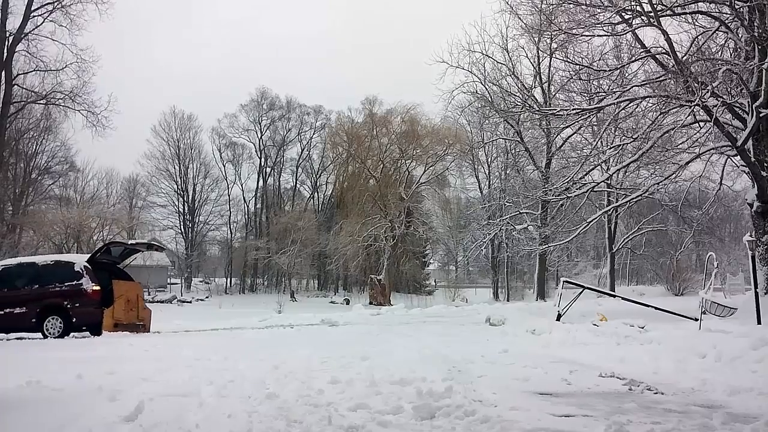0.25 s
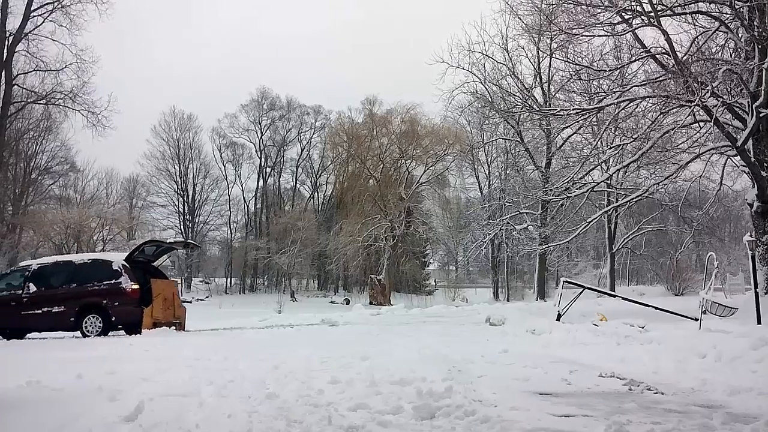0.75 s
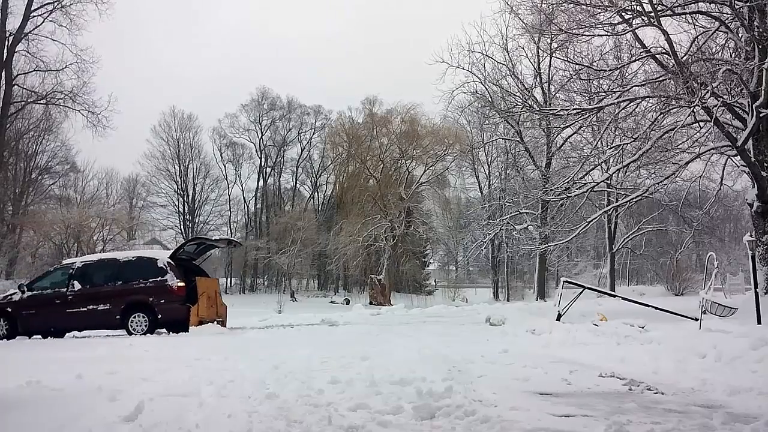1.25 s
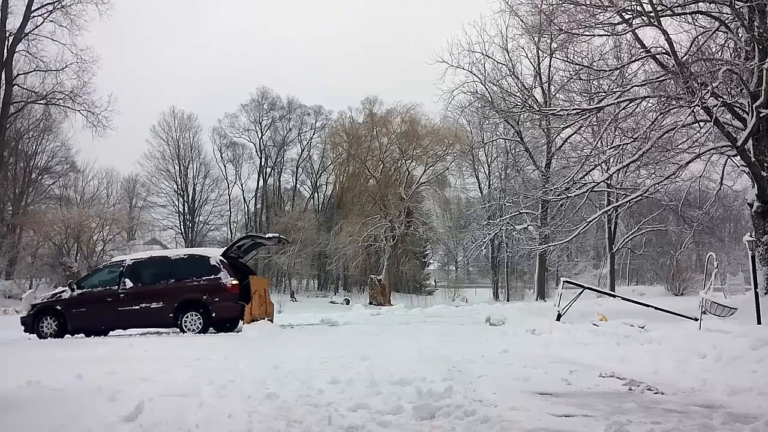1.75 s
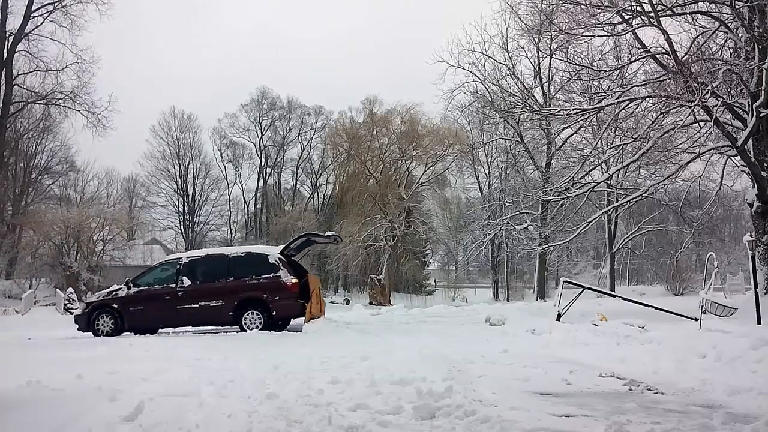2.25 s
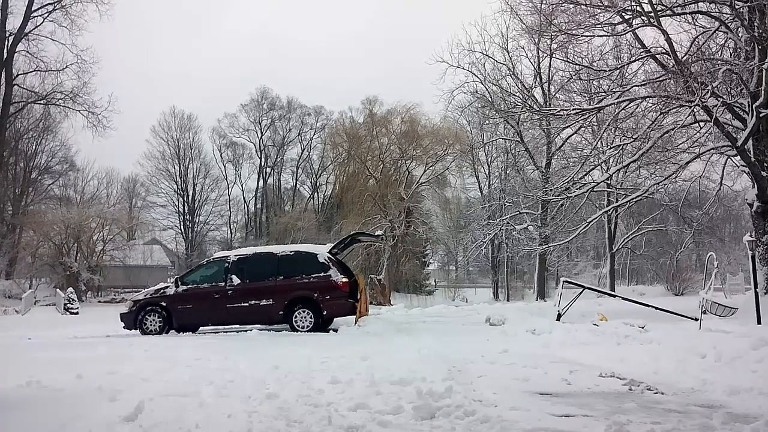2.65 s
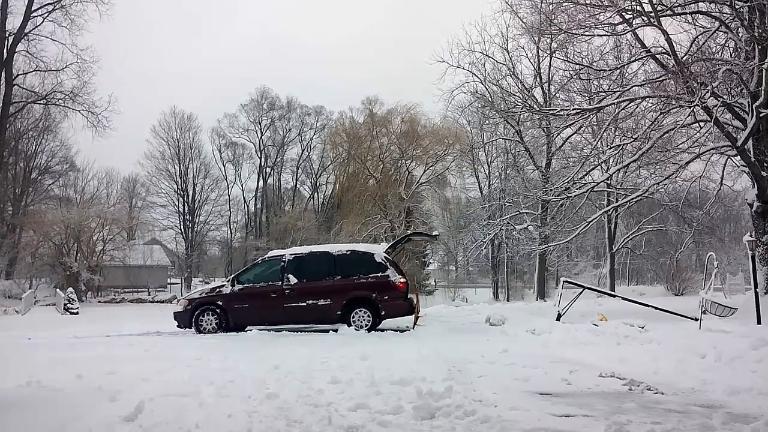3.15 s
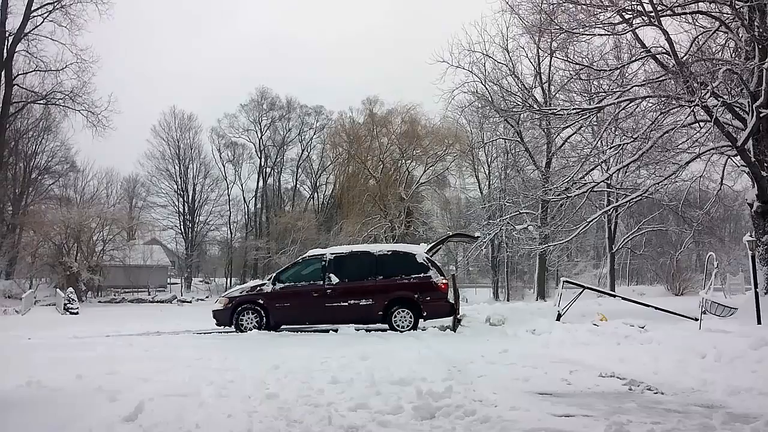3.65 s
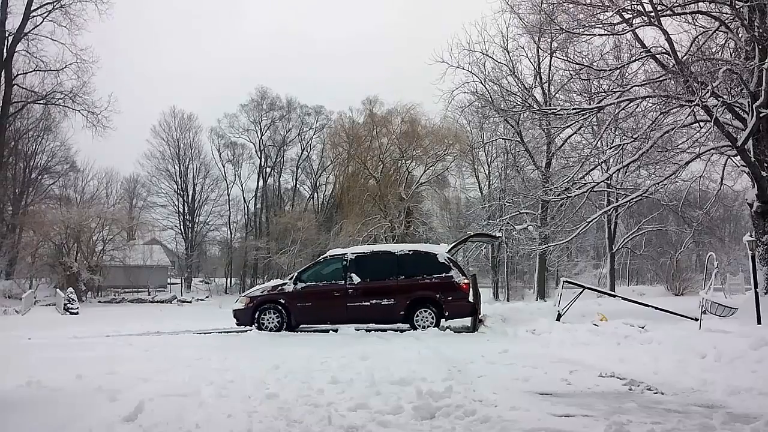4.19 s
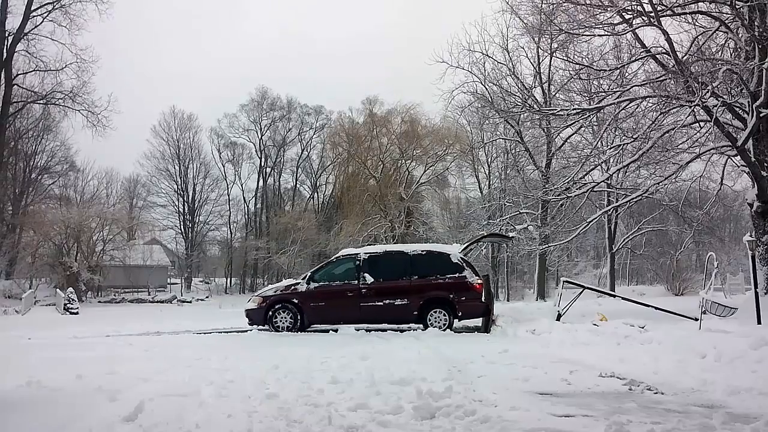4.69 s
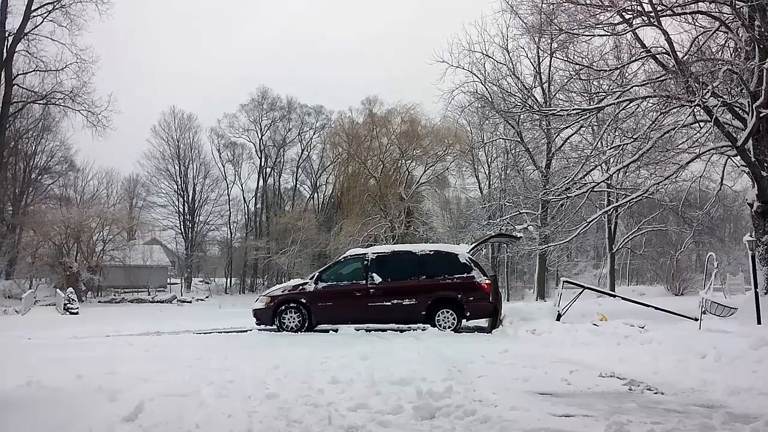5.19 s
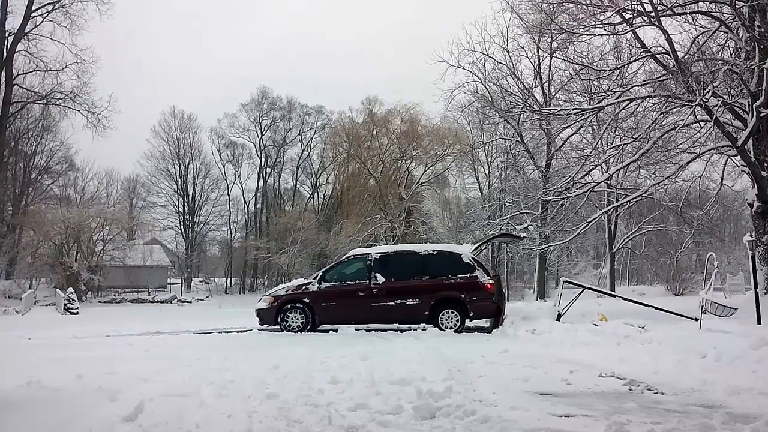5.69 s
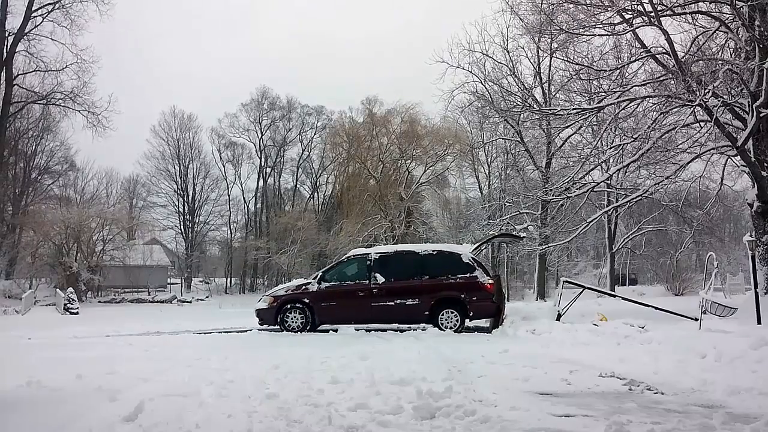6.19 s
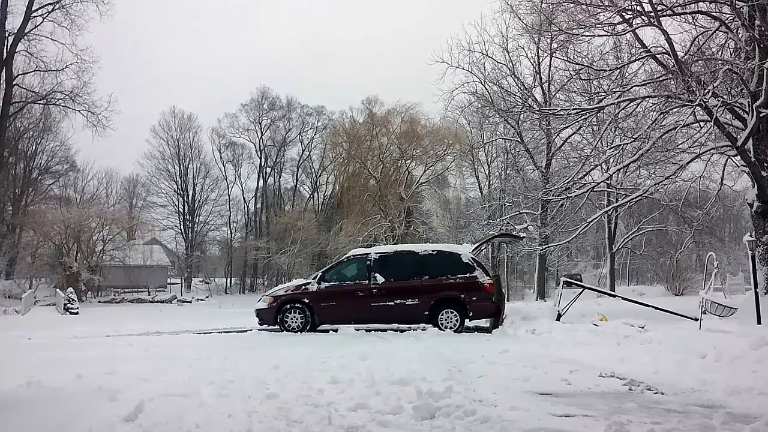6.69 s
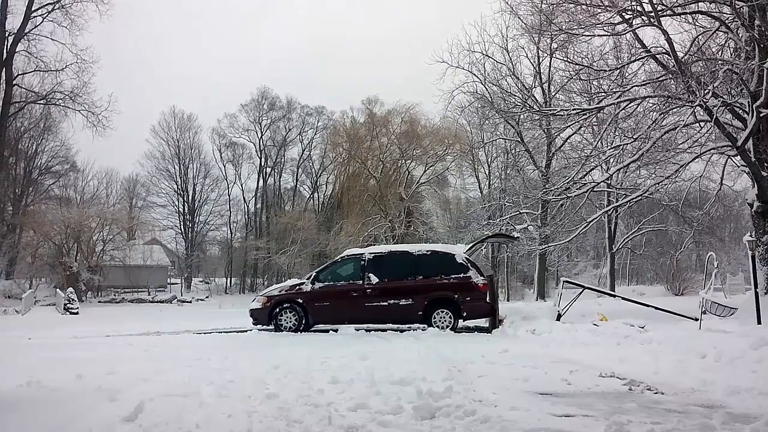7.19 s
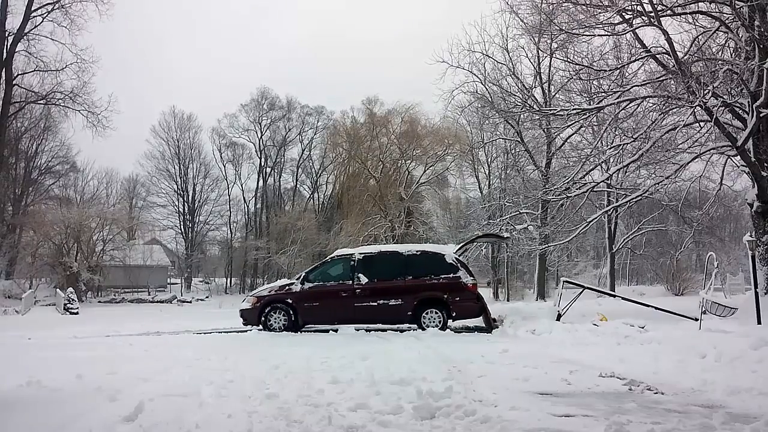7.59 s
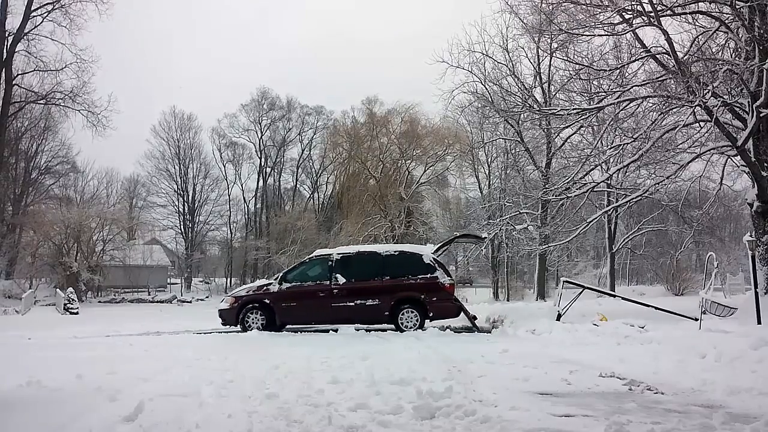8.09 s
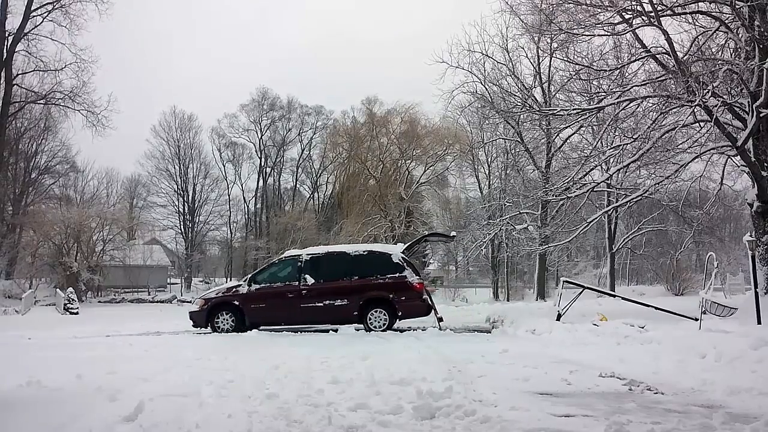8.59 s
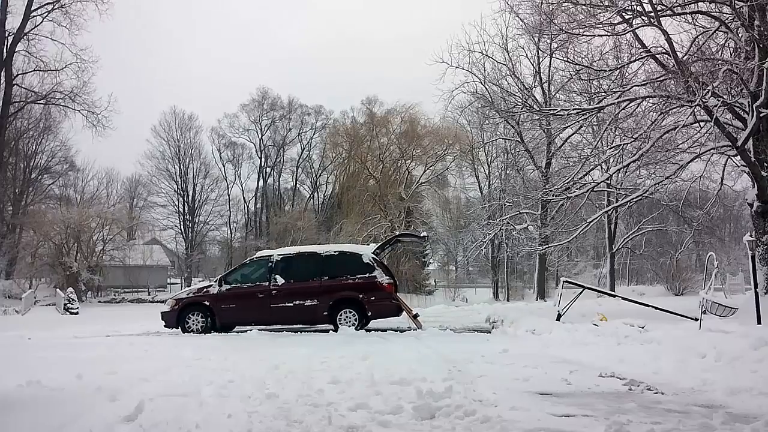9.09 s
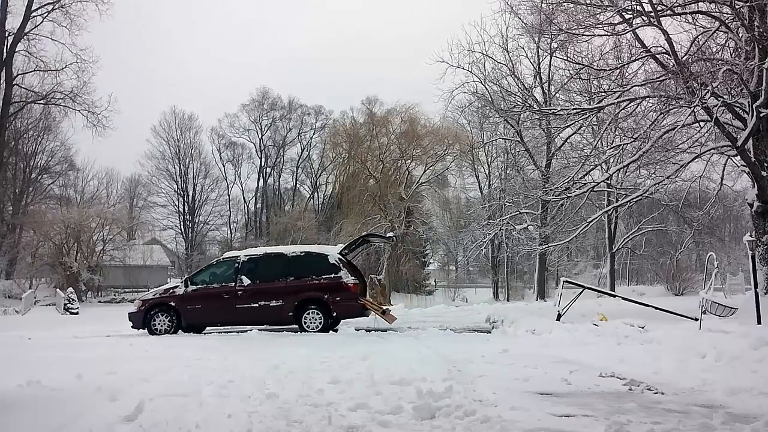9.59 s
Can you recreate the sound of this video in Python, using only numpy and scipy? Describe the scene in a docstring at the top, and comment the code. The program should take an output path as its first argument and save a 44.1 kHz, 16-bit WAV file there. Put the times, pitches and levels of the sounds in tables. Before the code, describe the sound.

In a snowy yard, a minivan backs up pushing snow with a plywood plow: low engine drone, gritty scraping, juddering board, a sharp early clack, squeaks and icy knocks. The scraping ends and the engine drops to a throbbing idle. A car passes on a wet road behind, then the van revs briefly and moves off with small metallic clicks. Distant stereo pickup outdoors.

```python
"""Minivan with a snow plow

A minivan backs through snow with a wooden plow: crushed grains judder and ring the board, then the van idles.
Its engine is a sum of multiples of a firing rate; two of them beat into a throb.
Behind it a car passes on a wet road: bands of noise that grow with nearness, swell and fade.
The van revs and pulls forward, and the plow's hinge clicks: short decaying tones as the board tips.
Heard from the yard, through two microphone ports."""
import sys
import numpy as np
from scipy import signal
from scipy.fft import rfft, irfft, next_fast_len
from scipy.io import wavfile
from scipy.ndimage import uniform_filter1d, map_coordinates

SR = 44100
rng = np.random.default_rng(int(sys.argv[2]) if len(sys.argv) > 2 else 0)


def generate_wav(signal):
    """Clip the signal to [-1, 1] and save it as 16-bit WAV at the path in sys.argv[1]."""
    frames = np.transpose(np.atleast_2d(signal))
    scaled = np.clip(frames, -1, 1) * 32767
    pcm = np.round(scaled).astype(np.int16)
    wavfile.write(sys.argv[1], SR, pcm)


N = 434385


def amp(db):
    """Decibels to gain."""
    return np.exp(np.asarray(db) * (np.log(10) / 20))


def unit(x):
    """x at rms 1."""
    return x / np.sqrt(np.mean(x ** 2) + 1e-20)


def along(points, hz):
    """(Hz, value) points interpolated on a log frequency axis."""
    point_hz, values = np.transpose(points)
    return np.interp(np.log(hz + 1), np.log(point_hz + 1), values)


def curves(rows):
    """One value per sample for each column after the time."""
    s, *columns = np.transpose(rows)
    return [np.interp(np.arange(N) / SR, s, column) for column in columns]


def during(rows):
    """1 up to the end of a table, then a 0.1 s fade."""
    end_s = rows[-1][0]
    return curves([(end_s, 1), (end_s + .1, 0)])[0]


def wobble(rate_hz, count=N):
    """Smooth random curve with rate_hz knots a second."""
    coarse = np.arange(0, count + 32, 32)
    knots = rng.standard_normal(int(N * rate_hz / SR) + 4)
    return np.interp(np.arange(count), coarse, map_coordinates(knots, [coarse * rate_hz / SR]))


def swells(times_s, lengths_s, levels_db, rise):
    """Gain of smooth swells peaking at the given times; rise is the share of each length before its peak."""
    t, power = np.arange(N) / SR, np.zeros(N)
    for s, length, db, share in np.broadcast(times_s, lengths_s, levels_db, np.clip(rise, .05, .95)):
        near = slice(*np.searchsorted(t, [s - length, s + length]))
        ramp = np.interp(t[near], [s - share * length, s, s + (1 - share) * length], [0, 1, 0])
        power[near] += (amp(db) * ramp) ** 2
    return np.sqrt(power)


def add(track, s, sound):
    """Mix a sound into a track at time s."""
    part = track[round(s * SR):][:len(sound)]
    part += sound[:len(part)]


def filtered(x, response):
    """x times a complex response of frequency."""
    size = next_fast_len(N + SR // 2)
    spectrum = rfft(x.astype(np.float32), size) * response(np.fft.rfftfreq(size, 1 / SR))
    return irfft(spectrum.astype(np.complex64), size)[..., :N]


def coloured(x, spectrum):
    """x through a (Hz, dB) spectrum, at rms 1."""
    return unit(filtered(x, lambda hz: amp(along(spectrum, hz))))


def grains(rate_hz, spread_db, channels=3):
    """Tiny fractures at random moments, of random sign and size; one row for each path to the ports."""
    count = int(rate_hz * N / SR)
    scale, kick = rng.standard_normal((2, channels, count))
    size = amp(spread_db * np.clip(scale, -2, 2)) * kick
    moments = rng.integers(N, size=(channels, count))
    return unit(np.array([np.bincount(m, g, N) for m, g in zip(moments, size)]))


def patches(shape):
    """Smooth random field over frequency and time, at rms 1."""
    over_hz = uniform_filter1d(rng.standard_normal(shape), size=3, axis=0)
    return unit(uniform_filter1d(over_hz, size=12, axis=1))


def gliding(gain, centre_hz, patchy_db, channels=3):
    """Patchy noise on each path, whose gain(frequency / centre) follows a moving centre."""
    noise = rng.standard_normal((channels, N), dtype=np.float32)
    hz, t, z = signal.stft(noise, SR, nperseg=1024)
    ratio = (hz[:, None] + 1) / np.interp(t, np.arange(N) / SR, centre_hz)
    shaped = z * (gain(ratio) * amp(patchy_db * patches(z.shape[1:])))
    return unit(signal.istft(shaped, SR, nperseg=1024)[1][:, :N])


PORT_S = 0.00048  # sound's travel time between the ports


def diffuse(pair):
    """Two unrelated signals as sound from all sides: alike at both ports mostly in the bass."""
    alike = lambda hz: 0.65 * np.sinc(2 * hz * PORT_S)
    mid, side = filtered(pair, lambda hz: np.sqrt(np.abs([1 + alike(hz), 1 - alike(hz)]) / 2))
    return np.array([mid + side, mid - side])


def outdoors(paths, bearing, scatter_db):
    """The first path arrives from a bearing; the other two are scattered by the trees."""
    lag, = curves(bearing)
    direct = np.array([map_coordinates(paths[0], [np.arange(N) + side * lag / 2], mode="nearest")
                       for side in (-1, 1)])
    # twigs scatter treble far more than bass
    treble = filtered(paths[1:], lambda hz: hz / (hz + 1100))
    return direct + amp(scatter_db) * diffuse(treble * signal.windows.tukey(N, .001))


# Decay of the tree echoes. Each row: frequency in Hz, t60 in s.
TREE_T60_S = [(200, 0.33), (10000, 0.011)]


def echoed(x):
    """Three paths of a sound: the direct one and two short echoes from the trees."""
    hz, t, z = signal.stft(rng.standard_normal((2, SR // 4)), SR, nperseg=256)
    decay = amp(-60 * t / along(TREE_T60_S, hz)[:, None])
    tails = signal.istft(z * decay, SR, nperseg=256)[1]
    echoes = [signal.oaconvolve(x, tail / np.linalg.norm(tail))[:N] for tail in tails]
    return np.array([x] + echoes)


# Far traffic spectrum. Each row: frequency in Hz, relative level in dB.
AIR_DB = [(20, 3), (200, -1), (400, -11), (700, 2.5), (1050, 1.5), (1350, -6), (2200, -8), (3300, -19),
          (11000, -30), (14500, -48)]


def air():
    """The faint rush of far traffic all around the yard: steady coloured noise."""
    return amp(-53.5) * diffuse(coloured(rng.standard_normal((2, N)), AIR_DB))


# Tyre roar spectrum for a centre of 1000 Hz. Each row: frequency in Hz, relative level in dB.
ROAR_SPECTRUM_DB = [(200, -8.5), (330, -4), (450, -11.5), (640, -4), (780, -6.5), (1000, 1), (1200, -3),
                    (1400, -12), (2000, -15), (3000, -32.5), (6000, -59.5)]
# Tyre noise swelling and fading. Each row: peak in seconds, length in seconds, hiss level in dB,
# hiss centre in Hz, roar level in dB; both levels relative.
TYRE_SWELLS_DB = [(4.623, .75, -62, 1830, -49), (5.74, 0.85, -49.5, 1750, -48.5),
                  (6.255, 0.82, -48, 1780, -46.5), (6.462, .26, -48, 1820, -51),
                  (7.062, 1.24, -48, 1815, -47.5), (7.665, .36, -49, 1770, -49),
                  (8.105, 0.35, -59, 1540, -51.5), (8.38, 0.49, -56, 1680, -64),
                  (8.752, 0.57, -55.5, 1960, -55), (9.246, .7, -64, 1490, -52.5)]
PATCH_RISE = 0.53  # share of a tyre swell or slush patch spent building up
PASS_S, ROAD_M, CAR_M_PER_S = 5.46, 27.4, 12.8  # closest moment, distance then, speed
IN_VIEW_S, HIDDEN_S, FADE_S, SCREEN_DB = 4.12, 9.72, 0.092, -7  # trees screen it before and after
ROAR_DB, HISS_DB = -49, -58.5  # relative, at closest
ROAR_HZ, ROAR_SHIFT = 930, 0.055  # centre between swells at closest; its downward shift as the car passes, as a share
SWELL_BRIGHTENS = 0.095  # rise of the centre at the strongest swell, as a share


def road():
    """Tyre roar near 1 kHz with hiss above it; both grow as the car nears, and the roar sinks as it passes."""
    t = np.arange(N) / SR
    along_m = CAR_M_PER_S * (t - PASS_S)
    distance_m = np.hypot(ROAD_M, along_m)
    in_view = (np.tanh((t - IN_VIEW_S) / FADE_S) - np.tanh((t - HIDDEN_S) / FADE_S)) / 2
    nearness = ROAD_M / distance_m * amp(SCREEN_DB * (1 - in_view))
    s, length_s, hiss_db, hiss_hz, surge_db = np.transpose(TYRE_SWELLS_DB)
    hiss_swell = swells(s, length_s, hiss_db, PATCH_RISE)
    surge = swells(s, length_s, surge_db, PATCH_RISE)
    # the centres move as the ground reflection shifts; the roar brightens with each swell
    roar_hz = ROAR_HZ * (1 - ROAR_SHIFT * along_m / distance_m)
    roar_hz = roar_hz * (1 + SWELL_BRIGHTENS * surge / surge.max())
    roar = gliding(lambda ratio: amp(along(ROAR_SPECTRUM_DB, 1000 * ratio)), roar_hz, patchy_db=2.8)
    hiss_band = lambda ratio: 1 / (1 + (np.log2(ratio) / 0.21) ** 4)
    hiss = gliding(hiss_band, np.interp(t, s, hiss_hz), patchy_db=3.5)
    # the hiss fades faster with distance than the roar
    hiss_gain = np.hypot(amp(HISS_DB) * nearness ** 2, hiss_swell) * amp(-6.0 + 0.77 * wobble(14))
    roar_gain = np.hypot(amp(ROAR_DB) * nearness, surge) * amp(0.56 * wobble(5))
    return roar_gain * roar + hiss_gain * hiss


# Narrow band of tyre hiss. Each row: time in seconds, centre in Hz, relative level in dB.
NARROW_HISS_HZ_DB = [(7.2, 2140, -85), (7.5, 2250, -68), (8.22, 2450, -62), (8.5, 2400, -69),
                     (8.88, 2350, -61), (9.45, 2480, -59), (9.85, 2400, -74)]


def narrow_hiss():
    """A narrow band of tyre hiss, favoured by ground reflection, wavers and creeps upward."""
    hz, db = curves(NARROW_HISS_HZ_DB)
    band = lambda ratio: 1 / (1 + (np.log2(ratio) / 0.059) ** 4)
    return amp(db - 5.5) * gliding(band, hz, patchy_db=6.0)


# Patches of slush. Each row: peak in seconds, length in seconds, relative level in dB.
SLUSH_PATCHES_DB = [(5.552, 1.0, -62.5), (6.378, 1, -66), (8.317, 0.98, -64.5), (8.874, 0.17, -61),
                    (9.173, 0.18, -69), (9.357, 0.82, -65)]
# Spray spectrum. Each row: frequency in Hz, relative level in dB.
SPRAY_DB = [(1200, -19), (2300, 11), (3000, 3.5), (4000, -4), (5100, -6.5), (7000, -20.5), (10000, -18),
            (14000, -46)]
SLUSH_FLOOR_DB = -80.5  # relative; thin spray between the patches


def slush():
    """Wheels squeeze wet snow into a fine crackling spray of grains."""
    gain = np.hypot(amp(SLUSH_FLOOR_DB), swells(*np.transpose(SLUSH_PATCHES_DB), PATCH_RISE))
    return gain * amp(1 + 1.3 * wobble(30)) * coloured(grains(8000, spread_db=3.0), SPRAY_DB)


# Hinge and fittings. Each row: start in seconds, ring level in dB, pitch in Hz, ring t60 in seconds,
# relative level of crumbling snow in dB.
CLICKS_DB_HZ_S = [(3.003, -55, 3100, .036, -64), (3.076, -54, 3200, .036, -68),
                  (7.004, -45, 2990, 0.044, -55), (7.842, -51, 8600, 0.012, -49.5),
                  (7.864, -59, 8200, 0.013, -67), (9.14, -56.5, 3824, 0.032, -61)]
# Crumbling snow spectrum. Each row: frequency in Hz, relative level in dB.
CRUMBS_DB = [(800, 11), (2000, 11), (5000, -6), (10000, -14.5), (13000, -41)]


def clicks():
    """A steel fitting clicks with a short decaying ring and shakes loose snow down."""
    track, crumbs, t = np.zeros(N), np.zeros(N), np.arange(SR // 4) / SR
    for s, ring_db, hz, t60_s, snow_db in CLICKS_DB_HZ_S:
        # the rattling contact blurs the pitch
        blur_rad = np.cumsum(rng.standard_normal(len(t))) * hz / 60000
        add(track, s, amp(ring_db - 60 * t / t60_s) * np.sin(2 * np.pi * hz * t + blur_rad))
        add(crumbs, s, amp(snow_db - 60 * t / 0.23))
    snow = coloured(grains(6000, spread_db=-3.5, channels=1)[0], CRUMBS_DB)
    return track + amp(5.0) * crumbs * snow


# One sharp clack: weak lead-in, main blow, faint follow-up. Each row: start in seconds, relative level in dB.
CLACK_BLOWS_DB = [(0.2157, -27), (0.2166, -14.5), (0.2175, -37)]
# Clack modes. Each row: frequency in Hz, relative level in dB, t60 in seconds.
CLACK_MODES_HZ_DB_S = [(1125, -2, 0.028), (1627, -2.5, 0.03), (4920, -17, .012), (9040, -30.5, 0.015),
                       (12800, -30, 0.009)]


def clack():
    """One sharp clack: fast-decaying modes struck by a lead-in, main blow and follow-up within 2 ms."""
    track, t = np.zeros(N), np.arange(SR // 16) / SR
    ring = sum(amp(db - 60 * t / t60_s) * np.sin(2 * np.pi * hz * t)
               for hz, db, t60_s in CLACK_MODES_HZ_DB_S)
    onset = 1 - np.exp(-t / 0.00055)
    for s, db in CLACK_BLOWS_DB:
        add(track, s, amp(db - 1) * ring * onset)
    return track


# V6 speed. Each row: time in seconds, mean firing rate of one cylinder bank in Hz.
BANK_FIRING_HZ = [(0, 32.1), (0.87, 34.9), (1.1, 34), (1.48, 34.4), (2.0, 35.7), (2.6, 34.2), (2.85, 28.0),
                  (3.12, 24.5), (3.98, 21.2), (6.86, 21.2), (7.1, 21.8), (7.41, 21.5), (7.73, 22.8),
                  (8.09, 29.4), (8.2, 30.7), (8.29, 29.8), (8.64, 23.6), (9.19, 21.8), (9.85, 21.7)]
# Exhaust boom. Each row: time in seconds, relative level in dB.
BOOM_DB = [(0, -37.5), (1.34, -36.5), (1.59, -31.5), (2.45, -26), (2.61, -26), (2.71, -37.5), (2.92, -32),
           (3.08, -33), (3.16, -38.5), (3.3, -33), (3.79, -30.5), (4.06, -34.5), (4.47, -32.7),
           (5.3, -32.7), (6.2, -34.8), (6.88, -35.3), (7.08, -30), (7.68, -30.5), (7.9, -38.5),
           (8.01, -27.5), (8.12, -31), (8.56, -31.5), (8.63, -36.5), (9.05, -31.5)]
# Burble strength. Each row: time in seconds, relative level in dB.
THROTTLE_DB = [(0, 1.5), (2.5, 6), (3.3, -1.5), (4.5, 1.5), (5.3, 3.5), (7.6, -0.5), (8.0, 10), (8.45, 6.5),
               (8.7, 3)]
# Effort. Each row: time in seconds, effort (0 low idle, 1 fast idle, 2 pulling, 3 revving).
EFFORT_STEPS = [(3.08, 2), (3.17, 1), (3.6, 1), (4.05, 0), (6.9, 0), (7.05, .6), (7.83, 1), (7.98, 3),
                (8.5, 3), (8.62, 1), (9.3, .8)]
# Strong boom lines. Each row: multiple of the firing rate, relative dB at low idle, fast idle, pulling.
LOW_ORDERS_DB = [(2, -22, -14, -1), (3, -21, -13, 1), (4, -0.5, -9, -5), (5, -0.5, 1.5, -21),
                 (6, -25.5, -8.5, -17)]
# Weak upper lines. Each row: multiple, relative dB at low idle, fast idle, pulling, revving.
UPPER_ORDERS_DB = [(7, -52.5, -51, -56.5, -62), (8, -56.5, -53, -53, -54), (9, -59, -67.5, -65, -60),
                   (10, -57.5, -53.5, -66, -59.5), (11, -62, -59.5, -65, -54), (12, -56, -61.5, -58, -58),
                   (13, -75, -67.5, -62, -59.5), (14, -58, -63, -69, -67)]
# Tailpipe, a poor radiator of deep bass. Each row: frequency in Hz, gain in dB.
TAILPIPE_DB = [(42, -19.5), (58, -18), (70, 1), (85, 3)]
# Muffler resonances on the upper lines. Each row: frequency in Hz, gain in dB.
MUFFLER_DB = [(148, -1), (168, -3.5), (188, 0), (220, 1.5), (245, 0.5), (275, -5.5), (297, -1),
              (325, -14.5), (360, -17), (405, -3), (500, -12)]
# Exhaust puff spectrum. Each row: frequency in Hz, relative level in dB.
BURBLE_DB = [(25, -21.5), (45, -21), (70, 7.5), (130, 3.5), (230, -2.5), (340, -16.5), (410, -13),
             (600, -28), (1500, -79)]
# Pulse smear in the pipe: phase lag in rad per squared step from the fourth multiple, at idle and pulling.
PULSE_SMEAR_RAD = [.5, .8]
FLUTTER_DB = 1.5  # scatter of firing strength at low idle


def engine():
    """Multiples of the bank firing rate: low ones lead when pulling; at idle 4 and 5 beat into a throb."""
    (rate_hz,), (boom_db,) = curves(BANK_FIRING_HZ), curves(BOOM_DB)
    (throttle_db,), (effort,) = curves(THROTTLE_DB), curves(EFFORT_STEPS)
    by_effort = lambda values: np.interp(effort, np.arange(len(values)), values)
    # firings scatter in strength and timing at idle; under load they even out
    lope = 1 / (1 + effort)
    flutter = amp(FLUTTER_DB * lope * wobble(21))
    jitter_rad = lope * (.025 * wobble(21) + .06 * wobble(4))
    phase = 2 * np.pi * np.cumsum(rate_hz) / SR + jitter_rad

    smear = np.interp(effort, [1, 2], PULSE_SMEAR_RAD)
    gains = np.array([amp(by_effort(db) + along(TAILPIPE_DB, k * rate_hz) + .6 * lope * wobble(8))
                      for k, *db in LOW_ORDERS_DB])
    shares = gains / np.linalg.norm(gains, axis=0)
    lines = sum(share * np.cos(k * phase - smear * (k - 4) ** 2)
                for share, (k, *_) in zip(shares, LOW_ORDERS_DB))
    boom = amp(boom_db - .7) * lines

    upper = np.zeros(N)
    for k, *db in UPPER_ORDERS_DB:
        gain = amp(by_effort(db) + 2.2 * wobble(7.5) + along(MUFFLER_DB, k * rate_hz))
        upper += gain * np.cos(k * phase + rng.uniform(0, 2 * np.pi))
    puffs = coloured(rng.standard_normal(N), BURBLE_DB) * (1 + 0.65 * np.cos(phase))
    tones = np.sqrt(2) * (boom + amp(throttle_db - 3.5) * upper)
    return flutter * (tones + amp(throttle_db / 2 - 53) * puffs)


# Short tones: board squeals, and the 1950 Hz ring of the click at 7.84 s. Each row: start in seconds,
# length in seconds, mean pitch in Hz, relative level in dB, pitch unsteadiness as a share.
SHORT_TONES_S_HZ_DB = [(0.788, 0.11, 185.3, -24, 0.049), (1.176, 0.026, 1451, -24.5, .012),
                       (1.776, 0.023, 1408, -30.5, .012), (1.79, 0.028, 1062, -33.5, 0.013),
                       (2.14, 0.07, 1465, -39, 0.014), (7.842, 0.11, 1950, -52.5, 0.02),
                       (8.965, 0.076, 818, -43, .01), (9.18, 0.22, 845, -48, 0.014)]


def short_tones():
    """Board squeals and the ring of one click: swelling tones of unsteady pitch."""
    track = np.zeros(N)
    for s, length_s, hz, db, unsteady in SHORT_TONES_S_HZ_DB:
        swell = signal.windows.tukey(round(length_s * SR), .6)
        pitch_hz = hz * (1 + unsteady * wobble(230, count=len(swell)))
        add(track, s, amp(db - 4.0) * swell * np.sin(2 * np.pi * np.cumsum(pitch_hz) / SR))
    return track


# Plywood modes. Each row: centre in Hz, width in Hz, relative level in dB.
BOARD_MODES_HZ_DB = [(485, 21, -6.5), (671, 18, -2), (853, 33, -3.5), (1049, 38, -2), (1145, 27, -2),
                     (1433, 25, -6)]


def plywood(x):
    """x ringing in the modes of the plow board: resonators of alternating sign."""
    def response(hz):
        total = 0
        for k, (centre_hz, width_hz, db) in enumerate(BOARD_MODES_HZ_DB):
            damping = 1j * hz * width_hz
            total = total + (-1) ** k * amp(db) * damping / (centre_hz ** 2 - hz ** 2 + damping)
        return total
    return filtered(x, response)


# Ice knocks. Each row: start in seconds, relative level in dB.
KNOCKS_DB = [(.111, -34), (1.232, -29), (1.465, -26), (1.812, -25), (1.841, -17), (2.16, -30), (2.548, -30),
             (7.963, -33)]
# Crushed snow and ice spectrum. Each row: frequency in Hz, relative level in dB.
CRUNCH_SPECTRUM_DB = [(900, -30.5), (1900, 3), (3200, -1.5), (4000, -8), (5200, -8.5), (7200, -18.5),
                      (10000, -23), (14000, -37)]


def knocks():
    """Each lump of ice gives the board a short noisy blow and shatters."""
    blows, t = np.zeros(N), np.arange(SR // 8) / SR
    for s, db in KNOCKS_DB:
        add(blows, s, amp(db - 60 * t / 0.06))
    thud = amp(7.5) * plywood(blows * rng.standard_normal(N))
    return thud + amp(-26) * blows * coloured(rng.standard_normal(N), CRUNCH_SPECTRUM_DB)


# Crust slabs snapping under the edge. Each row: peak in seconds, length in seconds, level in dB.
CRUSTS_DB = [(2.516, .024, -36), (2.529, .036, -35)]
# Snap spectrum. Each row: frequency in Hz, relative level in dB.
SNAP_DB = [(400, 1), (900, 7), (2200, 0), (3200, -3.5), (3900, -17.5), (5300, -21), (8000, -29),
           (14000, -37)]
# Heap packing tight. Each row: peak in seconds, length in seconds, level in dB.
PACKING_SWELLS_DB = [(2.553, 0.09, -39.5), (2.6, .24, -49.5), (3.072, 0.041, -53)]
# Packed snow spectrum. Each row: frequency in Hz, relative level in dB.
PACKED_DB = [(330, -22), (520, 0), (1200, 1.5), (1650, -27)]
CRUST_RISE = 0.33  # share of a snap or packing spent building up


def crusts():
    """Frozen crust breaks in a bright burst of cracks; the heap packs in coarse, dull grains."""
    snaps = swells(*np.transpose(CRUSTS_DB), CRUST_RISE) * coloured(grains(5000, spread_db=2.5), SNAP_DB)
    dull = filtered(grains(700, spread_db=3), lambda hz: 1 / (1 + (hz / 2500) ** 4))
    return snaps + swells(*np.transpose(PACKING_SWELLS_DB), CRUST_RISE) * coloured(dull, PACKED_DB)


GRIP_DB = 1.5  # unevenness from band to band


def gripping(x):
    """The edge grips now here, now there: single bands flare up briefly."""
    z = signal.stft(x.astype(np.float32), nperseg=512)[2]
    return unit(signal.istft(z * amp(GRIP_DB * patches(z.shape[1:])), nperseg=512)[1][:, :N])


# Steady drag, rough ground then softer snow. Each row: time in seconds, scrape and crunch in relative dB.
DRAG_DB = [(0, -34.5, -52), (0.55, -35.5, -50.5), (1.08, -31.5, -45), (1.22, -32.5, -50),
           (1.33, -42.5, -52.5), (2.15, -40, -49), (2.56, -47.5, -52), (2.76, -56, -63.5),
           (3.12, -71, -59.5), (3.25, -69, -80.5)]
# Heaps of snow; the row at 7.852 s is the dull body of the click at 7.84 s. Each row: peak in seconds, # length
# in seconds, share of it spent building up, scrape and judder in relative dB.
SHOVES_DB = [(0.075, 0.24, 0.25, -51, -34.5), (0.253, 0.17, 0.5, -59, -32.5),
             (0.433, 0.16, 0.53, -39.5, -45), (0.84, 0.13, 0.54, -35, -29), (1.176, 0.37, 0.56, -54, -33.5),
             (1.442, 0.3, 0.37, -37.5, -35), (1.598, 0.2, 0.28, -38.5, -60),
             (1.793, 0.11, 0.25, -32, -33.5), (2.162, 0.2, 0.54, -35, -31), (2.368, 0.17, 0.36, -38, -61),
             (2.558, 0.25, 0.38, -43, -29.5), (7.852, 0.099, 0.19, -56, -47.5),
             (8.875, 0.12, 0.38, -49.5, -46)]
# Judder spectrum. Each row: frequency in Hz, relative level in dB.
JUDDER_SPECTRUM_DB = [(60, -31), (120, -2.5), (165, 2), (195, 3.5), (270, -5), (350, -26), (800, -55)]
# Scrape spectrum. Each row: frequency in Hz, relative level in dB.
SCRAPE_SPECTRUM_DB = [(250, -26), (350, -9.5), (480, -8), (800, -2), (1500, -3.5), (2100, -14.5),
                      (3500, -28), (6000, -59.5)]
JUDDER_FLOOR_DB, JUDDER_FOLLOWS = -43.5, 0.75  # relative level at median drag; dB per dB of scrape
SHOVE_CRUNCH_DB = -15.5  # crunch of a shove relative to its scrape
CLUMP_DB = 1.45  # unevenness in time


def plow():
    """The edge slips over snow: the board judders and rings, crystals crush in clumps, heaps add shoves."""
    scrape_db, crunch_db = curves(DRAG_DB)
    pushing = during(DRAG_DB)
    s, length_s, rise, shove_db, shake_db = np.transpose(SHOVES_DB)
    shove, shake = swells(s, length_s, shove_db, rise), swells(s, length_s, shake_db, rise)
    clumps = amp(CLUMP_DB * wobble(95))

    median_db = np.median([row[1] for row in DRAG_DB])
    tremble = amp(JUDDER_FLOOR_DB + JUDDER_FOLLOWS * (scrape_db - median_db))
    judder_gain = np.hypot(pushing * tremble, shake) * amp(-1.5)
    judder = judder_gain * coloured(grains(900, spread_db=2), JUDDER_SPECTRUM_DB)

    rasp = coloured(grains(9000, spread_db=0.0) * clumps, SCRAPE_SPECTRUM_DB)
    ring = unit(plywood(grains(5000, spread_db=0.5) * clumps))
    scrape_gain = np.hypot(pushing * amp(scrape_db), shove) * amp(-4.5)
    scrape = scrape_gain * gripping(rasp + 0.72 * ring)

    crunch_gain = np.hypot(pushing * amp(crunch_db), amp(SHOVE_CRUNCH_DB) * shove) * amp(-0.83)
    crunch = crunch_gain * coloured(grains(6000, spread_db=-0.5) * clumps, CRUNCH_SPECTRUM_DB)
    return judder + scrape + crunch


# Bearing of the van. Each row: time in seconds, lag of the left port in samples.
VAN_LAG_SAMPLES = [(0, -4), (1.702, -3.5), (3, -0.5), (7.5, 6), (9.85, -4.5)]
# Bearing of the car. Each row: time in seconds, lag of the left port in samples.
ROAD_LAG_SAMPLES = [(5, 12), (6.4, 6.9), (8, 3.6), (9.85, 1.5)]


def scene():
    """The van crosses from the left and swings back; the road lies behind it to the right."""
    far = outdoors(road() + narrow_hiss() + slush(), ROAD_LAG_SAMPLES, scatter_db=4)
    van = outdoors(echoed(engine() + short_tones() + clicks() + clack()), VAN_LAG_SAMPLES, scatter_db=-5)
    snow = outdoors(plow() + crusts() + knocks(), VAN_LAG_SAMPLES, scatter_db=1.5)
    return air() + far + van + snow


# Left port over right. Each row: frequency in Hz, gain in dB.
LEFT_OVER_RIGHT_DB = [(60, 1.3), (630, 1), (2500, 1), (5000, 3.5), (8000, .6)]
TOP_HZ = 14700  # band limit


def record(dry):
    """The left port is a little more sensitive; a steep cut removes all above the band limit."""
    edges = signal.windows.tukey(N, .001)
    tilt = lambda hz: amp(np.outer([.5, -.5], along(LEFT_OVER_RIGHT_DB, hz)))
    ports = filtered(dry * edges, tilt)
    return filtered(ports, lambda hz: 1 / (1 + (hz / TOP_HZ) ** 200))


dry = scene()
out = record(dry)
generate_wav(out)
```